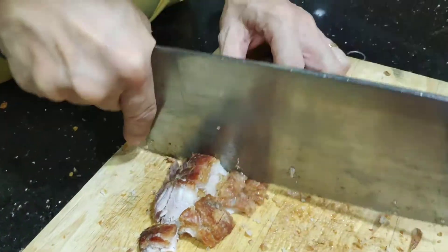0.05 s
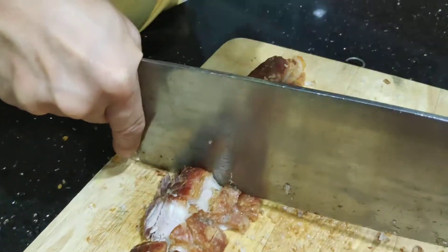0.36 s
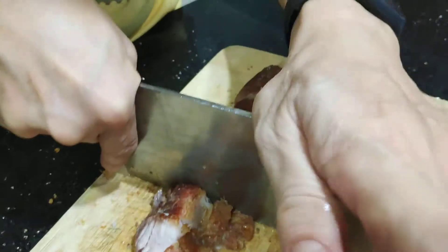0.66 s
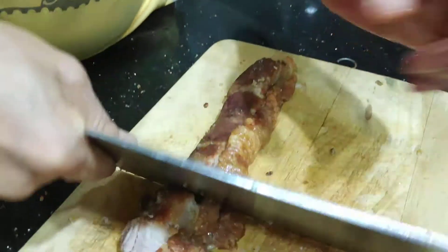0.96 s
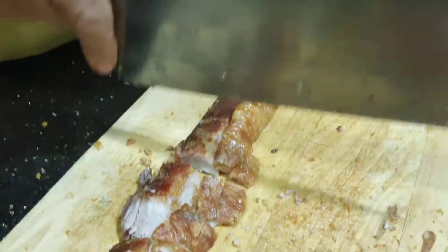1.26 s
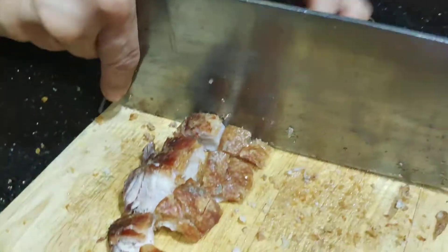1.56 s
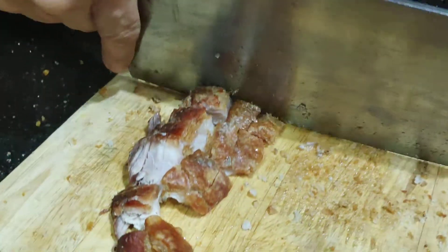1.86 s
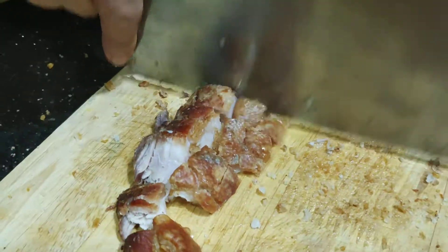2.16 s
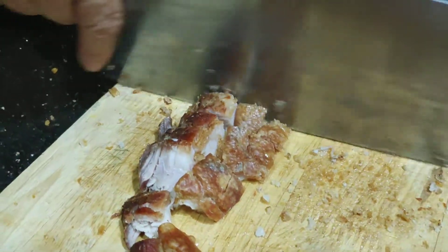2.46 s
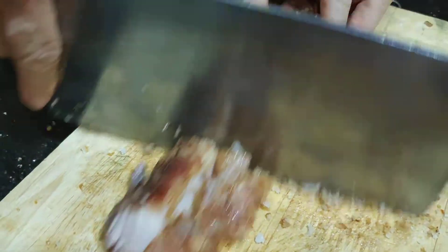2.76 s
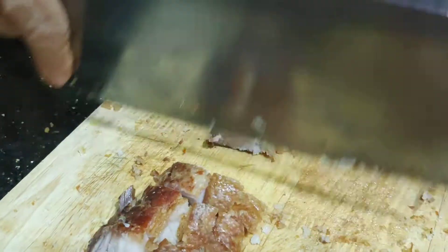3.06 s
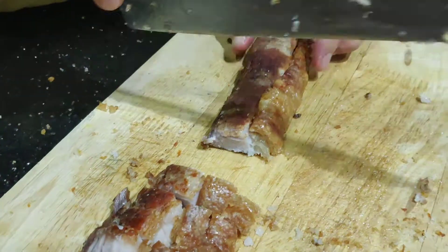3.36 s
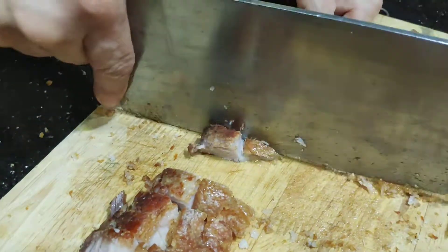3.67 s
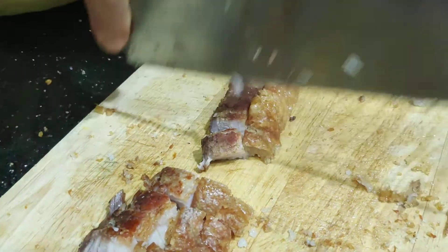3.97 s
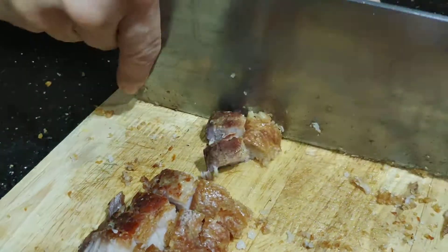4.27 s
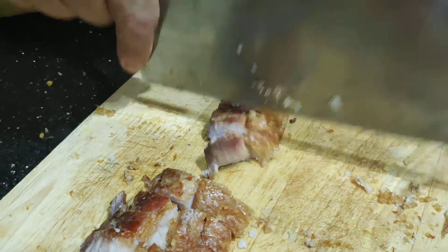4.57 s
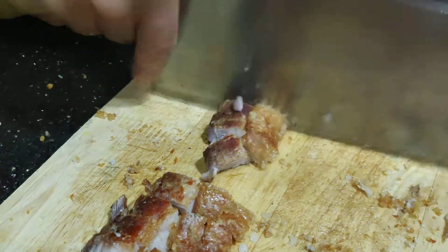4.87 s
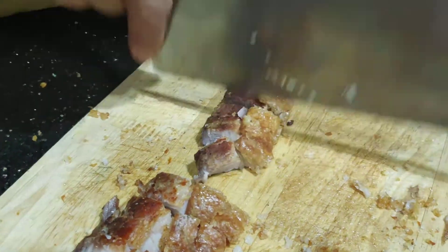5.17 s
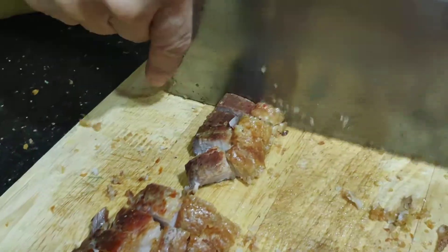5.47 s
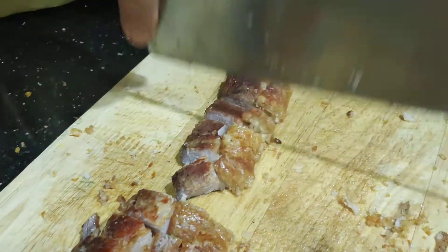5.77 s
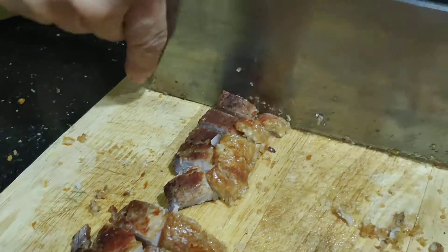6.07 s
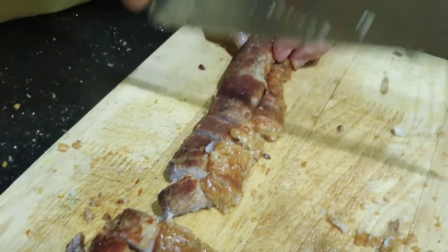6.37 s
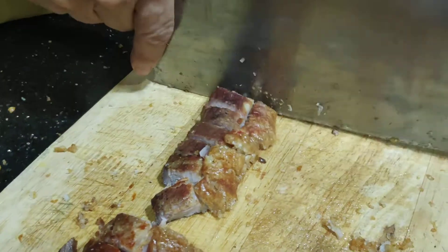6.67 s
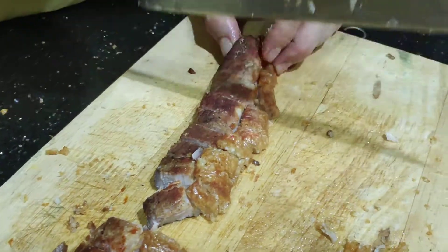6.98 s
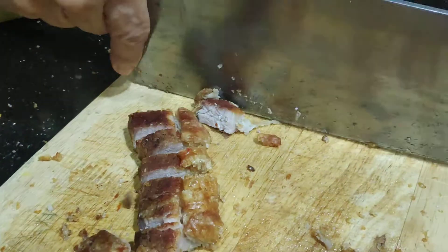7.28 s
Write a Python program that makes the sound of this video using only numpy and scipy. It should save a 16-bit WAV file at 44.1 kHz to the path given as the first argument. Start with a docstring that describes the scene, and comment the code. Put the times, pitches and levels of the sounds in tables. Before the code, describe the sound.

A heavy cleaver chops crisp roast pork on a wooden board, heard close in a hard-walled kitchen over faint air noise and appliance hum. At the start, the echo of a chop is fading. A firm chop lands at 0.6 seconds, a brittle crunch of skin running straight into a woody knock with a brief steel ring. Softer, duller chops follow at 1.4 and 2.2 seconds, with small ticks on the blade between. At about 2.5 and 2.7 seconds the blade lightly scrapes the slices aside, ending in a click and tap near 2.9. Chopping resumes at 3.5 seconds, then turns harder and quicker, with blows at 4.3, 4.9, 5.5, 6.0, 6.6 and 7.2 seconds. Each cracks the skin and hits the board with a sharp knock and low thud, and the room's short echo swells up behind the loudest.

```python
"""A heavy cleaver chops crisp roast pork on a wooden board in a hard-walled kitchen.
A chop's echo fades over air noise and appliance hum. Three chops follow, with small ticks between:
each bursts through the crackling and knocks on the board 10-30 ms after first touch.
Near 2.5 s the blade scrapes the slices aside in two strokes. From 3.5 s come seven more chops, mostly
harder; a limiter squashes the loud ones and lets go, so the room's ring swells up behind them."""
import sys
import numpy as np
from scipy import signal
from scipy.fft import rfft, irfft, next_fast_len
from scipy.io import wavfile
from scipy.ndimage import uniform_filter1d, minimum_filter1d

SR = 44100
rng = np.random.default_rng(int(sys.argv[2]) if len(sys.argv) > 2 else 0)


def dump(signal):
    """Clip the signal to [-1, 1] and save it as 16-bit WAV at the path in sys.argv[1]."""
    limited = np.clip(np.atleast_2d(signal).T, -1, 1)
    pcm = np.round(limited * 32767).astype(np.int16)
    wavfile.write(sys.argv[1], SR, pcm)


N = 322812
LEAD_SAMPLES = 8820
TIME_S = np.arange(-LEAD_SAMPLES, N) / SR

# room air: freq_hz, density_db
AIR_SPECTRUM = [(15, -52), (25, 5.5), (68, -27.5), (102, -1), (129, -19), (173, -5), (448, -18.5),
                (1290, -20.5), (1400, -24), (3010, -27.5), (6160, -33), (7610, -25.5), (8240, -31.5),
                (14000, -44.5)]
# appliance hum: pitch_hz, level_db
HUM_TONES = [(100, -60), (167, -64), (199, -62)]
# cleaver swings: start_s, break_delay_s, board_delay_s, crunch_db, meat_push_db,
# knock_db, spot_pitch_hz, steel_ring_db, arm_weight_db
CHOPS = [(-0.074, 0.0038, 0.015, 5, -11, -19, 1065, -17, -1),
         (0.5764, 0.00086, .0097, 2, -5, 2, 880, 9, 4.5),
         (1.4373, 0.013, 0.028, -8.5, -24, -9, 900, -19, -1.5),
         (2.2374, .0142, .0162, -27, -14, -6, 980, -19, 0.5),
         (3.5328, 0.0044, 0.025, 0, -20.5, -5.5, 2350, -5, -2),
         (4.2497, 0.0057, 0.022, 5.5, -28, 6, 2720, 0, 4),
         (4.914, 0.0042, 0.018, 5, -12.5, 10.5, 1560, 7.5, 4.5),
         (5.4729, .0038, .015, 2.5, -15.5, 14, 1040, -1, -3),
         (6.021, 0.0038, 0.013, 7.5, -12.5, 11.5, 1260, 5, 2),
         (6.5798, .004, .016, -4, -13.5, 13.5, 1030, -5, -1.5),
         (7.1384, .0042, 0.015, 3, -1, 13.5, 960, -9, 2.5)]
# shattering skin: freq_hz, density_db
SKIN_SPECTRUM = [(200, -14), (700, -10.5), (1500, -2), (3200, -3), (5500, 0), (7500, 3.5), (9200, 2),
                 (9900, -3), (12500, -4), (14200, -1)]
# pushed meat: freq_hz, density_db
MEAT_SPECTRUM = [(40, 0.5), (200, -16.5), (480, -11), (650, -10.5), (980, 3), (1400, -10), (2500, -6),
                 (5000, -49.5)]
# blade, damped by hand and meat: pitch_hz, width_hz, level_db
BLADE_MODES = [(2773, 88, 8), (6650, 17, 1.5), (7330, 58, -4.5), (7486, 100, 3), (9400, 34, -24),
               (12800, 150, -9)]
# blade facing right, rows left and right: gain_db
BLADE_PAN_DB = [
    [0],
    [1],
]
# board: pitch_hz, level_db, t60_s
BOARD_MODES = [(377, -63, 0.012), (460, -26, 0.077), (511.3, -20, 0.045), (577, -21, 0.007),
               (940, -25, 0.081), (1008, -12, 0.017), (1266, -1, 0.0016), (1940, 4, 0.0013)]
# board's dense high modes: freq_hz, density_db
CLATTER_SPECTRUM = [(100, -31), (280, -35), (450, 1.5), (800, 1), (1150, 6), (1600, 6), (2400, 7.5),
                    (3600, 2.5), (5000, 1), (7000, 7), (10000, -5), (14000, -10.5)]
# counter under the board: pitch_hz, level_db, t60_s
COUNTER_MODES = [(46.7, 0.5, 0.12), (93.8, 1.5, 0.21), (168.6, 9.5, 0.072)]
# echo decay: freq_hz, t60_s
ROOM_DECAY = [(60, 0.77), (250, 0.7), (500, 0.81), (1000, 0.7951), (2500, 0.7432), (5000, 0.69),
              (8000, 0.65), (14000, 0.42)]
# echo against direct sound: freq_hz, gain_db
ROOM_GAIN = [(40, -2), (120, 2.5), (280, -2), (450, -7), (620, -3), (950, -3.5), (1350, -6), (2400, -4.5),
             (4500, -2.5), (7500, -6.5), (10000, -6.5), (14000, -12.5)]
# left-right likeness: freq_hz, coherence
COHERENCE = [(100, 0.98), (300, 0.96), (550, 0.7), (1000, 0.38), (1800, 0.05), (14000, 0.034)]
# crumbs and fingers on the blade: start_s, snap_db, ring_db
TICKS = [(0.2950, -25, -32), (0.9087, -28, -30), (0.921, -32, -27.5), (1.9596, -41, -40), (2.682, -33, -39),
         (2.6992, -34, -39), (2.7286, -40, -43), (2.755, -42, -33.5), (2.8646, -27, -31), (2.876, -19, -35),
         (4.042, -42, -54)]
# bare edge set down on the board: start_s, level_db, spot_pitch_hz
TAPS = [(0.922, -29.5, 1090), (2.8767, -25.5, 2330)]
# blade pushing slices: start_s, length_s, level_db, swell_db, bite_db
STROKES = [(2.462, 0.13, -42.5, -2.5, -2.5), (2.727, 0.14, -42, 7, 1)]
# edge rubbing wood: freq_hz, density_db
RUB_SPECTRUM = [(100, 5.5), (500, 5.5), (1000, 1), (1450, 5), (2300, 4.5), (3600, -4), (5200, 1),
                (5900, -4), (6600, 4), (9000, 2.5), (9800, -14), (10800, -4), (11900, -20), (13000, -3),
                (14200, -32)]
# edge pressed on wood: pitch_hz, width_hz, level_db
PRESSED_EDGE_MODES = [(2350, 260, -5), (5150, 300, -4), (6300, 260, 4), (10800, 490, -4), (12800, 700, 4)]
# scrape position, rows left and right: gain_db
SCRAPE_PAN_DB = [
    [-4],
    [-2],
]


def amp(db):
    return 10 ** (np.asarray(db) / 20)


def lookup(table, hz):
    """Interpolate over log frequency."""
    freq_hz, value = np.transpose(table)
    return np.interp(np.log(hz + 1), np.log(freq_hz + 1), value)


def add(mix, start_s, sound):
    part = mix[:, round(start_s * SR) + LEAD_SAMPLES:][:, :sound.shape[1]]
    part += sound[:, :part.shape[1]]


def colour(x, spectrum, size=2048):
    """Causal unit-energy filter shaped to the spectrum."""
    log_gain = np.log(amp(lookup(spectrum, abs(np.fft.fftfreq(size, 1 / SR)))))
    response = np.exp(np.conj(signal.hilbert(log_gain)))
    taps = np.fft.ifft(response).real[:size // 2]
    return signal.oaconvolve(x, taps[None] / np.linalg.norm(taps), axes=1)[:, :x.shape[1]]


def spaced_pair(x):
    """Two spaced microphones: same bass, unrelated treble."""
    size = next_fast_len(x.shape[1])
    left, other = rfft(x, size)
    coherence = lookup(COHERENCE, np.fft.rfftfreq(size, 1 / SR))
    right = coherence * left + np.sqrt(1 - coherence ** 2) * other
    return irfft(np.array([left, right]), size)[:, :x.shape[1]]


def resonate(x, modes):
    return sum(amp(db) * signal.lfilter(*signal.iirpeak(hz, hz / width_hz, SR), x)
               for hz, width_hz, db in modes)


def background(air_db=-50.5, waver_rad=0.34):
    """Steady air noise and a faint, wavering appliance hum."""
    noise = spaced_pair(rng.standard_normal((2, len(TIME_S))))
    air = amp(air_db) * colour(noise, AIR_SPECTRUM, size=8192)
    knots_s = np.linspace(TIME_S[0], TIME_S[-1], num=40)
    hum = 0
    for hz, db in HUM_TONES:
        phase_rad = waver_rad * np.interp(TIME_S, knots_s, rng.standard_normal(len(knots_s)))
        hum += amp(db) * np.sqrt(2) * np.sin(2 * np.pi * hz * TIME_S + phase_rad)
    return air + hum


def cracks(n, per_s, spread_db):
    """Tiny fractures of uneven size, rms 1."""
    size = amp(spread_db * np.minimum(rng.exponential(1, n), 4))
    fires = rng.random(n) < per_s / SR
    train = size * fires * rng.standard_normal((2, n))
    return train / np.sqrt(np.mean(train ** 2) + 1e-20)


def burst(envelope, per_s, spread_db):
    """Fractures under an envelope, with its energy in each channel."""
    train = envelope * cracks(len(envelope), per_s, spread_db)
    return train * np.linalg.norm(envelope) / (np.linalg.norm(train, axis=1, keepdims=True) + 1e-12)


def blade_ring(force):
    """A force drives the steel's modes."""
    return resonate(force, BLADE_MODES) * amp(BLADE_PAN_DB)


def crackling(touch_rise_s=0.0021, touch_s=0.0054, break_rise_s=0.0019, break_s=0.0052,
              touch_ring_db=9, break_ring_db=5):
    """The skin cracks at first touch, shatters, then tears; the blade rings, the meat pushes dully."""
    skin, blade, meat = np.zeros((3, 2, len(TIME_S)))
    t = np.arange(SR // 20) / SR
    touching = (1 - np.exp(-t / touch_rise_s)) * np.exp(-(t / touch_s) ** 2)
    breaking = (1 - np.exp(-t / break_rise_s)) * np.exp(-(t / break_s) ** 2)
    for start_s, break_delay_s, board_delay_s, crunch_db, push_db, *_ in CHOPS:
        cut_s = max(board_delay_s - break_delay_s, break_s)
        cutting = np.sin(np.pi * np.minimum(t / cut_s, 1))
        touch = burst(amp(-12 + 0.2 * crunch_db) * touching, per_s=20000, spread_db=-1.5)
        crunch = burst(amp(crunch_db) * breaking, per_s=24000, spread_db=2)
        tear = burst(amp(-6.5 + 0.41 * push_db) * cutting, per_s=9000, spread_db=7)
        push = burst(amp(push_db) * cutting, per_s=23000, spread_db=1.5)
        add(skin, start_s, touch)
        add(blade, start_s, amp(touch_ring_db) * touch)
        add(skin, start_s + break_delay_s, crunch + tear)
        add(blade, start_s + break_delay_s, amp(break_ring_db) * crunch)  # meat now damps the blade
        add(meat, start_s + break_delay_s, push)
    ring = blade_ring(np.diff(colour(blade, SKIN_SPECTRUM), prepend=0))
    return colour(spaced_pair(skin), SKIN_SPECTRUM) + ring + colour(spaced_pair(meat), MEAT_SPECTRUM)


def knock(level_db, spot_hz, ring_db, sharp_hz, flex_db, thud_db,
          clatter_db=-7.5, clatter_t60_s=0.06, spot_db=3, flex_below_hz=600, thud_rise_s=0.0033):
    """One blow rings the counter, the board's low modes, its dense high ones and the blade."""
    t = np.arange(SR * 3 // 4) / SR
    thud = sum(amp(db - 60 * t / t60_s) * np.sin(2 * np.pi * hz * t) for hz, db, t60_s in COUNTER_MODES)
    thud *= 1 - np.exp(-t / thud_rise_s)
    modes = -sum(amp(db + flex_db * (hz < flex_below_hz) - 60 * t / t60_s) * np.sin(2 * np.pi * hz * t)
                 for hz, db, t60_s in BOARD_MODES)
    force = burst(amp(clatter_db - 60 * t / clatter_t60_s), per_s=24000, spread_db=0.5)
    clatter = colour(spaced_pair(force), CLATTER_SPECTRUM)
    clatter += amp(spot_db) * signal.lfilter(*signal.iirpeak(spot_hz, Q=4, fs=SR), clatter)
    ring = blade_ring(amp(ring_db) * signal.unit_impulse(len(t)) * np.linalg.norm(force[0]))
    cushion = np.exp(-2 * np.pi * sharp_hz / SR)  # meat under the edge: low-pass pole
    blow = signal.lfilter([1 - cushion], [1, -cushion], modes + clatter + ring)
    radiation = signal.butter(3, 350, "highpass", fs=SR)  # a small board radiates little bass
    return amp(level_db) * signal.lfilter(*radiation, blow) + amp(thud_db) * thud


def board(sharp_at_0db_hz=1460, db_per_octave=11):
    """Chops end on the board, sharper and with more thud when harder; twice the edge only taps."""
    out = np.zeros((2, len(TIME_S)))
    for start_s, _, board_delay_s, _, _, knock_db, spot_hz, ring_db, weight_db in CHOPS:
        sharp_hz = sharp_at_0db_hz * 2 ** (knock_db / db_per_octave)  # less meat left to cushion
        flex_db = 6.5 - 0.49 * knock_db + weight_db  # low modes grow less than the rest
        thud_db = -34 + 0.78 * knock_db + weight_db
        add(out, start_s + board_delay_s, knock(knock_db, spot_hz, ring_db, sharp_hz, flex_db, thud_db))
    for start_s, level_db, spot_hz in TAPS:
        add(out, start_s, knock(level_db, spot_hz, ring_db=-10, sharp_hz=3600, flex_db=2.5, thud_db=-68))
    return out


def kitchen_echo(x, gap_s=0.00042, build_s=0.00058):
    """Tiled walls: a dense tail that builds quickly and dies faster in the treble."""
    hz, t, noise = signal.stft(spaced_pair(rng.standard_normal((2, SR))), SR, nperseg=512)
    t60_s = lookup(ROOM_DECAY, hz)[:, None]
    unit_energy = np.sqrt(2 * np.log(1000) / (t60_s * SR))
    decay = amp(lookup(ROOM_GAIN, hz)[:, None] - 60 * t / t60_s)
    _, tail = signal.istft(noise * unit_energy * decay, SR, nperseg=512)
    age_s = np.maximum(np.arange(tail.shape[1]) / SR - gap_s, 0)
    tail *= 1 - np.exp(-age_s / build_s)
    return signal.fftconvolve(x, tail, axes=1)[:, :x.shape[1]]


def ticks(snap_decay_s=0.0017, ping_hz=7840, width_hz=117, rise_s=0.00089):
    """Crumbs and fingers snap against the blade, pinging one mode."""
    snaps, pings = np.zeros((2, 2, len(TIME_S)))
    t = np.arange(SR // 25) / SR
    envelope = np.exp(-np.pi * width_hz * t) * (1 - np.exp(-t / rise_s))
    ping = 2 * envelope * np.sin(2 * np.pi * ping_hz * t)
    for start_s, snap_db, ring_db in TICKS:
        add(snaps, start_s, burst(amp(snap_db) * np.exp(-t / snap_decay_s), per_s=10000, spread_db=7.5))
        add(pings, start_s, amp(ring_db) * amp(BLADE_PAN_DB) * ping)
    return colour(snaps, SKIN_SPECTRUM) + pings


def scrape(attack_s=0.02, release_s=0.013, ring_db=-5, hiss_db=-2, rasp_db=-3):
    """The edge drags in small slips: thin hiss when light, rasp when it bites."""
    out = np.zeros((2, len(TIME_S)))
    for start_s, length_s, level_db, swell_db, bite_db in STROKES:
        t = TIME_S - start_s
        pressure = np.clip(t / attack_s, 0, 1) * np.exp(-np.maximum(t - length_s, 0) / release_s)
        gain = amp(level_db + swell_db * np.clip(t / length_s, 0, 1))
        slips = cracks(len(TIME_S), per_s=4100, spread_db=-0.5) * pressure * gain
        rub = colour(spaced_pair(slips), RUB_SPECTRUM)
        hiss = np.diff(rub, prepend=0)
        rasp = amp(bite_db) * (amp(rasp_db) * rub + resonate(rub, PRESSED_EDGE_MODES))
        out += amp(SCRAPE_PAN_DB) * (amp(hiss_db) * hiss + rasp) + amp(ring_db) * blade_ring(hiss)
    return out


def scene(crossfade_period_s=4, left_lag_samples=5):
    """Work at the board, its echo and the background."""
    direct = crackling() + board() + ticks() + scrape()
    # three random echo tails crossfade, so the room's ring stays smooth with no fixed colour
    crossfade_rad = 2 * np.pi * TIME_S / crossfade_period_s
    shares = [np.sqrt(2 / 3) * np.cos(crossfade_rad + k * np.pi / 3) for k in range(3)]
    echo = sum(kitchen_echo(direct * share) for share in shares)
    near = np.array([np.roll(direct[0], left_lag_samples), direct[1]])
    return (near + echo + background())[:, LEAD_SAMPLES:]


def record(dry, low_cut_hz=33, threshold_db=-9.0, hold_s=0.024, release_s=0.052, high_cut_hz=14400):
    """Low cut, fast limiter with hold and release, soft clip, high cut."""
    dry = signal.lfilter(*signal.butter(2, low_cut_hz, "highpass", fs=SR), dry)
    power = uniform_filter1d((dry ** 2).mean(0), size=64)
    over_db = np.maximum(10 * np.log10(abs(power) + 1e-12) - threshold_db, 1e-6)
    over_db[0] = 6  # starts ducked by the opening chop
    hold_samples = 2 * int(hold_s * SR / 2) + 1
    held_db = -minimum_filter1d(-over_db, hold_samples, origin=hold_samples // 2)
    fall = np.arange(N) / SR / release_s
    duck_db = np.exp(np.maximum.accumulate(np.log(held_db) + fall) - fall)
    ducked = dry * amp(-uniform_filter1d(duck_db, size=32))
    clipped = ducked / (1 + ducked ** 4) ** 0.25
    high_cut = signal.firwin(201, high_cut_hz, window=("kaiser", 7), fs=SR)
    return signal.oaconvolve(clipped, high_cut[None], "same")


dry = scene()
out = record(dry)
dump(out)
```